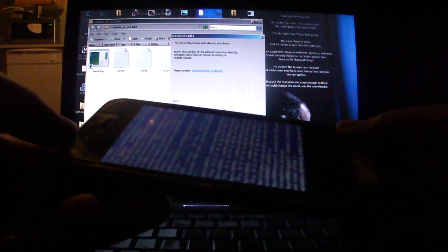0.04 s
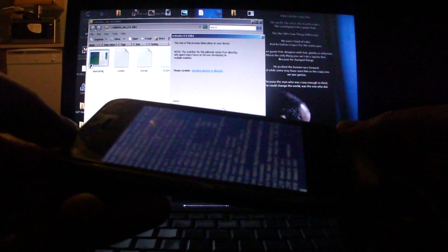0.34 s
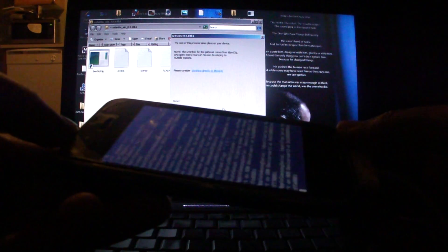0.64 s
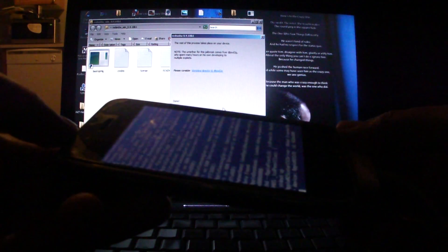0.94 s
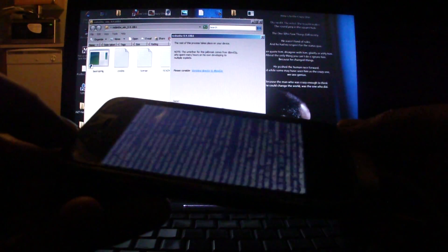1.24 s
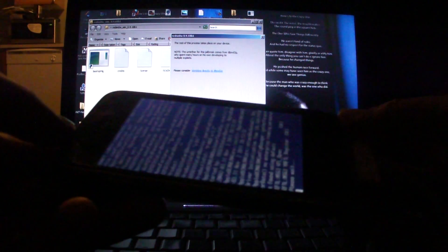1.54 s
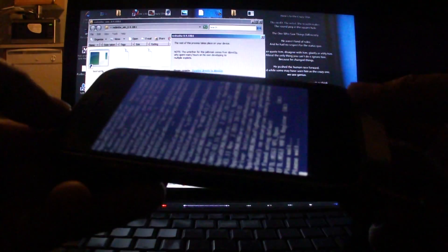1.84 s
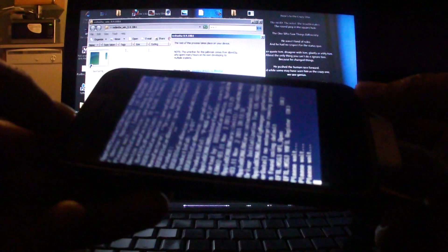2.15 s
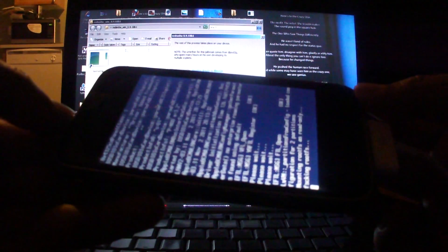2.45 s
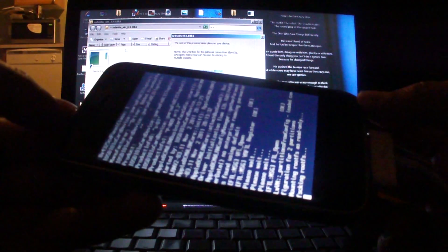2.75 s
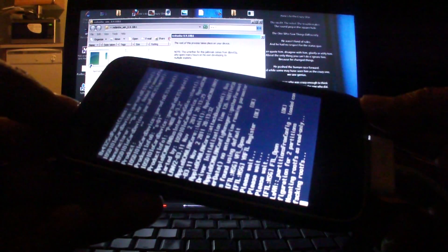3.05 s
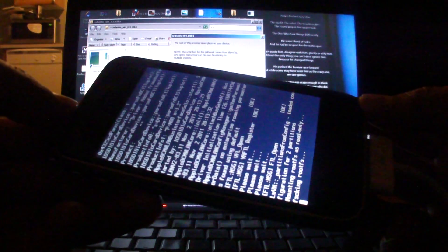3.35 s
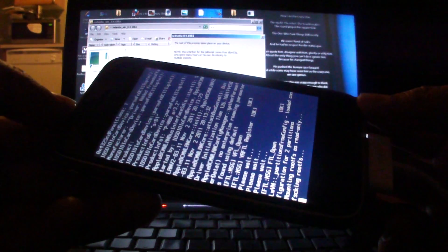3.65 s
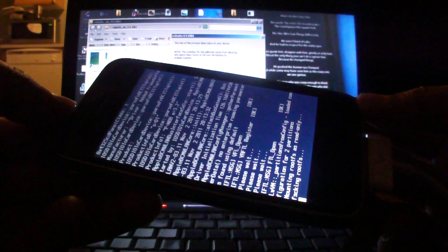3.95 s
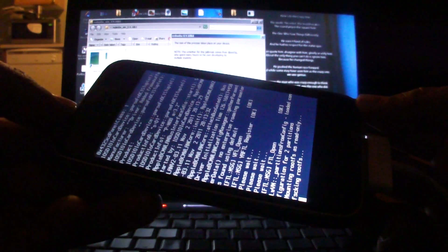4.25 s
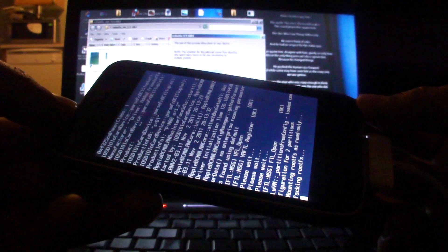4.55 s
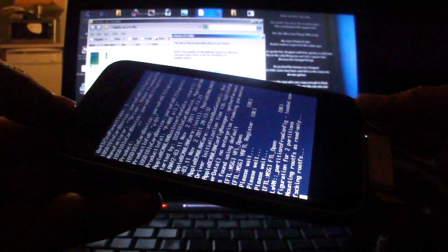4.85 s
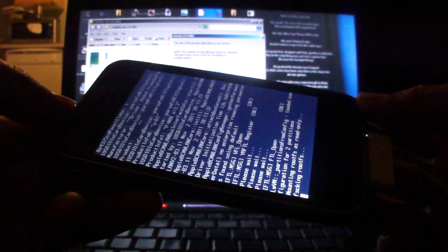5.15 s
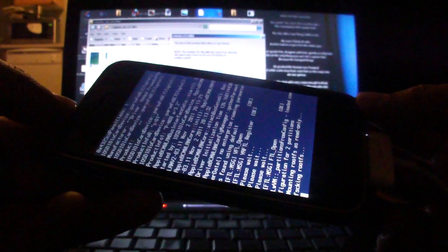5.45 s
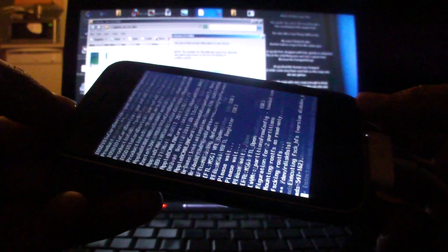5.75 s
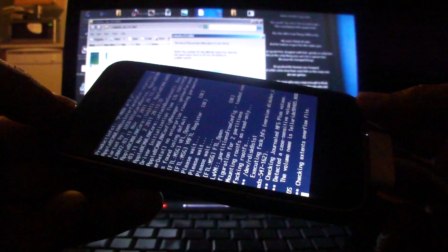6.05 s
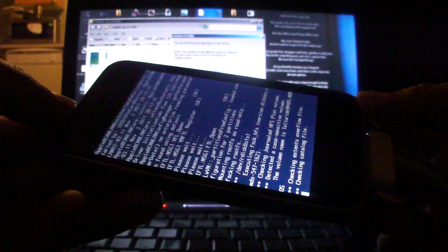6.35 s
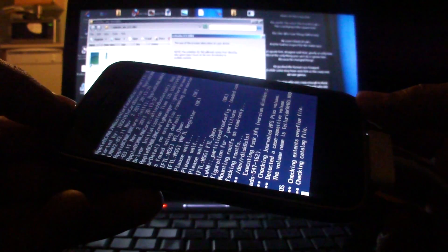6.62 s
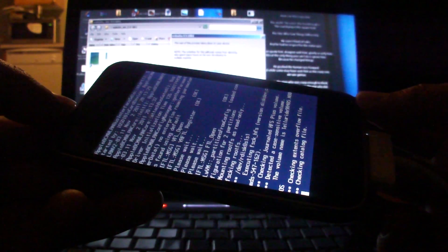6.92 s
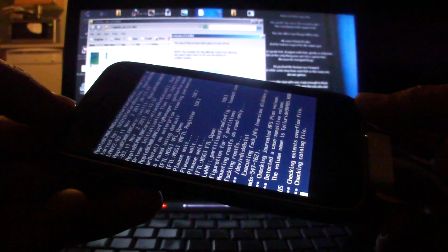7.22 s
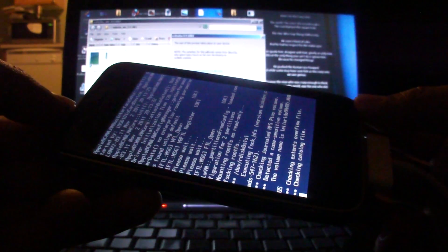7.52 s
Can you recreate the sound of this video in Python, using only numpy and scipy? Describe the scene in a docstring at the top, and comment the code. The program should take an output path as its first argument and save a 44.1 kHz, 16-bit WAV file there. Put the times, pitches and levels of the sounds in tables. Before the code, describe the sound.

A laptop's cooling fan runs just right of a stereo microphone in a quiet room, its airy rush topped by a thin tone. The fan gains speed, and the tone climbs, briefly fades, then returns stronger and stays steady. Underneath are light microphone hiss and the faint, fast ticking of a focus motor on the left, which ends in a little click as the fan carries on.

```python
"""A quiet room, a laptop slightly to the right of a camera's stereo microphones. From the start, air
rushes through the laptop's vent under the thin whine of its fan blades; the microphones hiss, and the
camera's focus motor ticks faintly, close on the left. After half a second the fan speeds up: the rush
grows, and the whine rises, flares, nearly vanishes, then swells and holds at the higher speed.
Near 6.7 s the focus motor stops with a click and the fan runs on."""
import sys
import numpy as np
from scipy.fft import rfft, irfft, next_fast_len
from scipy.io import wavfile
from scipy.ndimage import map_coordinates

SR = 44100
rng = np.random.default_rng(int(sys.argv[2]) if len(sys.argv) > 2 else 0)


def output_pcm(signal):
    """Save a mono or channel-first signal as 16-bit PCM at the path in sys.argv[1].

    Samples are clipped to [-1, 1] before scaling.
    """
    pcm = np.clip(np.atleast_2d(signal).T, -1, 1) * 32767
    wavfile.write(sys.argv[1], SR, np.round(pcm).astype(np.int16))


N = 334278


def blade_rate(slow_hz=1328.3, fast_hz=1571.4, spin_up_s=.575, inertia_s=.5):
    """Blades passing the outlet per second: turned up, the rotor's inertia lets it gain speed gradually."""
    since_s = np.maximum(np.arange(N) / SR - spin_up_s, 0)
    return fast_hz - (fast_hz - slow_hz) * np.exp(-since_s / inertia_s)


def airflow(blade_hz, level_db=-46.0, speed_power=2.0, flutter_db=0.17):
    """Turbulence in the vent makes a rush that grows as a power of the fan's speed."""
    # colour of the air through the vent: frequency_hz, relative_db
    air_spectrum = [(25, -56), (42, -43.5), (65, -29.5), (90, -21), (200, -7.5), (390, -2.5), (560, 0),
                    (950, -2.5), (1500, 1.5), (1800, -3), (2200, -9.5), (2450, -11.5), (2800, -16),
                    (3500, -24), (6000, -54)]
    # likeness of the air's sound at the two microphones: frequency_hz, coherence
    air_coherence = [(60, 0.04), (220, -0.25), (390, 0.21), (580, 0.59), (950, 0.59), (1450, 0.86),
                     (2200, 0.61), (2450, 0.55), (3300, 0.6)]
    # narrow peaks and a dip colouring the rush of air: centre_hz, width_hz, gain_db
    ripple_bands = [(290, 50, 1.5), (573, 46, 1.5), (802, 68, 1.65), (1060, 48, 2), (1393, 46, -1),
                    (1924, 60, 2), (2060, 40, 3.5), (2368, 130, 5.5)]
    ripple = lambda f: amp(sum(db / (1 + (2 * (f - hz) / width) ** 2) for hz, width, db in ripple_bands))
    rush = unit(filtered(noise(air_spectrum, air_coherence), ripple))
    speed = blade_hz / blade_hz.max()
    return amp(level_db + flutter_db * wobble(9.5)) * speed ** speed_power * rush


def whine(blade_hz, flutter_db=0.5, sway_db=0.34, jitter_rad=.05, apart_rad=0.071):
    """Each blade pushes a puff past the outlet; uneven inflow makes the tone tremble and sway."""
    # the whine flares, nearly vanishes, then grows to a steady strength: time_s, level_db
    swell = [(0, -52), (0.7, -51.5), (1.09, -48.5), (1.17, -44), (1.38, -46.5), (1.66, -57.0), (1.83, -47),
             (2.3, -45.5), (3.2, -41.5), (5.3, -41), (7.58, -40.5)]
    # partials of the whine: multiple_of_blade_rate, relative_db, left_over_right_db
    partials = [(1, 7, -0.6), (2, -42.5, 3), (5, -46, 7)]
    phase = 2 * np.pi * np.cumsum(blade_hz) / SR + jitter_rad * wobble(25)
    phase = phase + apart_rad * np.array([wobble(21), wobble(14)])  # its own waver at each microphone
    tone = sum(amp(db) * pan(balance_db) * np.sin(round(k) * phase) for k, db, balance_db in partials)
    level_db = curve(swell) + flutter_db * wobble(30) + sway_db * wobble(12)
    return amp(level_db) * unit(tone)


def electronics(hiss_db=-63):
    """The microphones' own hiss, almost unrelated left and right, with a faint hum and whistle."""
    # colour of the hiss: frequency_hz, relative_db
    hiss_spectrum = [(40, -18), (1000, -11), (3500, -8.5), (4600, -3), (5700, 2), (7400, 0.4), (9000, -2.5),
                     (10500, -8), (11300, -13), (12000, -28), (13300, -33.5), (14200, -26), (15700, -12.5)]
    # hum and whistle of the electronics: pitch_hz, level_db
    steady_tones = [(598, -68.5), (15734, -97)]
    t = np.arange(N) / SR
    tones = sum(amp(db) * unit(np.sin(2 * np.pi * hz * t + 0.11 * wobble(5.5))) for hz, db in steady_tones)
    return amp(hiss_db) * noise(hiss_spectrum, coherence=[(1000, .05)]) + tones


def focus_motor(field_hz=59.94, delay_s=.0009, scatter_db=1.05, halfway_db=-13, balance_db=11):
    """The motor steps once per picture field, strong and weak in turn, and ticks faintly in between."""
    # runs of the motor: start_s, end_s, level_db, weak_step_drop_db
    runs = [(0, .49, -68, 13), (.53, 1.48, -69, 5), (1.94, 6.7, -69.5, 3.5)]
    # the lens clicks as it stops: time_s, level_db
    stop_clicks = [(1.5096, -67), (6.7155, -58.5)]
    track = np.zeros((2, N))
    for start_s, end_s, level_db, drop_db in runs:
        for field in np.arange(np.ceil(start_s * field_hz), end_s * field_hz):
            step_db = level_db - drop_db * (field % 2 == 0) + scatter_db * rng.standard_normal()
            add(track, field / field_hz + delay_s, lens_tick(step_db, balance_db))
            add(track, (field + .5) / field_hz + delay_s, lens_tick(step_db + halfway_db, balance_db))
    for time_s, level_db in stop_clicks:
        add(track, time_s, lens_tick(level_db, balance_db))
    return track


def lens_tick(level_db, balance_db, attack_s=.0002):
    """One knock on the lens barrel: its energy is shared anew among the modes."""
    # ringing modes of the barrel: pitch_hz, relative_db, t60_s
    modes = [(5770, -1.5, 0.0049), (7300, -6, 0.0056), (7850, -3.5, 0.0057), (8070, -7.5, 0.005),
             (9100, -14, 0.004), (10500, -18, .002)]
    t = np.arange(SR // 100) / SR
    hz, db, t60 = np.transpose(modes)[:, :, None]
    strength = amp(db + 1.6 * rng.standard_normal((2, len(modes), 1)))
    phase = 2 * np.pi * rng.random((2, len(modes), 1))
    decay = np.exp(-np.log(1000) * t / t60)
    ring = (strength * decay * np.sin(2 * np.pi * hz * t + phase)).sum(axis=1)
    ring *= 1 - np.exp(-t / attack_s)
    return amp(level_db) * pan(balance_db) * np.array([unit(side) for side in ring])


def amp(db):
    """Decibels to gain."""
    return 10 ** (np.asarray(db) / 20)


def unit(x):
    """x at rms 1."""
    return x / np.sqrt(np.mean(x ** 2) + 1e-20)


def pan(balance_db):
    """Gains at the two microphones; a positive balance lies to the left."""
    return amp(np.array([[balance_db], [-balance_db]]) / 2)


def along(points, hz):
    """(frequency_hz, value) points joined on a log axis."""
    frequencies, values = np.transpose(points)
    return np.interp(np.log(hz + 1), np.log(frequencies + 1), values)


def curve(rows):
    """(time_s, value) rows as one value per sample."""
    return np.interp(np.arange(N) / SR, *np.transpose(rows))


def wobble(rate):
    """A smooth random curve with rate knots a second."""
    knots = rng.standard_normal(int(N * rate / SR) + 4)
    return map_coordinates(knots, [np.arange(N) * rate / SR])


def filtered(x, response):
    """x with its spectrum multiplied by response(hz)."""
    size = next_fast_len(N + SR // 2)
    return irfft(rfft(x, size) * response(np.fft.rfftfreq(size, 1 / SR)), size)[..., :N]


def noise(spectrum, coherence):
    """Stereo noise of rms 1 with a given colour and likeness at the two microphones."""
    side_angle = lambda hz: np.arccos(np.clip(along(coherence, hz), -1, 1)) / 2
    colour = lambda hz: amp(along(spectrum, hz)) * [np.cos(side_angle(hz)), np.sin(side_angle(hz))]
    mid, side = filtered(rng.standard_normal((2, N)), colour)
    return unit(np.array([mid + side, mid - side]))


def add(track, start_s, sound):
    """Mix a short sound into the track at start_s."""
    part = track[:, max(0, round(start_s * SR)):][:, :sound.shape[1]]
    part += sound[:, :part.shape[1]]


def scene():
    """The fan slightly to the right, and the camera's own small noises close to the microphones."""
    blade_hz = blade_rate()
    return airflow(blade_hz) * pan(balance_db=-1) + whine(blade_hz) + electronics() + focus_motor()


def record(dry, top_hz=15780):
    """The camera cuts notches into the treble and keeps nothing above its band limit."""
    # stop bands of the camera's sound path: centre_hz, width_hz
    stop_bands = [(3000, 1260), (4000, 590), (5000, 810), (12000, 3500)]
    notch = lambda f, hz, width: (hz ** 2 - f ** 2) / (hz ** 2 - f ** 2 + 1j * f * width)
    notches = lambda f: np.prod([notch(f, hz, width) for hz, width in stop_bands], axis=0)
    return filtered(dry, lambda f: notches(f) * (f < top_hz))


dry = scene()
out = record(dry)
output_pcm(out)
```